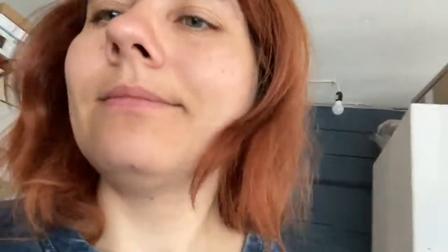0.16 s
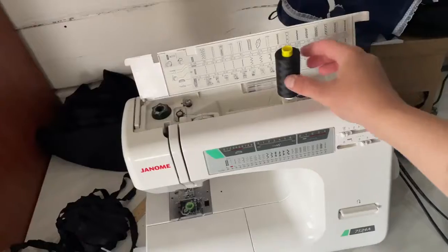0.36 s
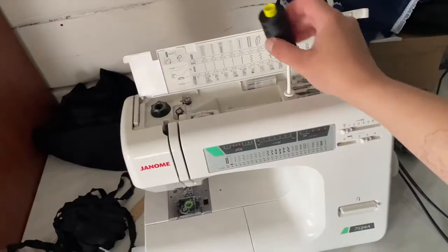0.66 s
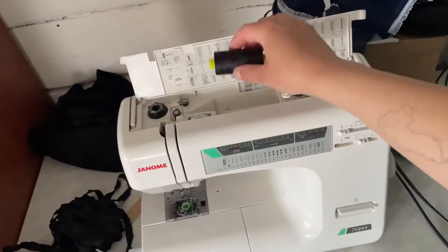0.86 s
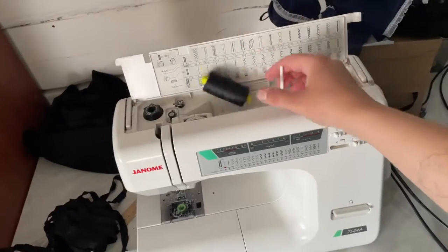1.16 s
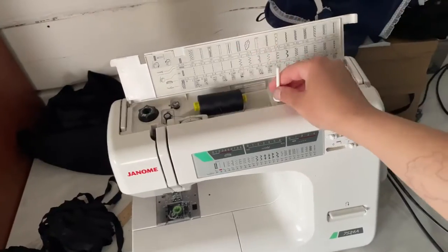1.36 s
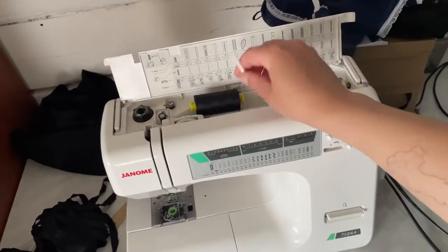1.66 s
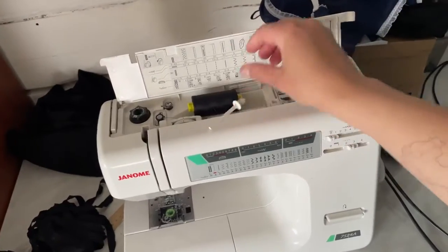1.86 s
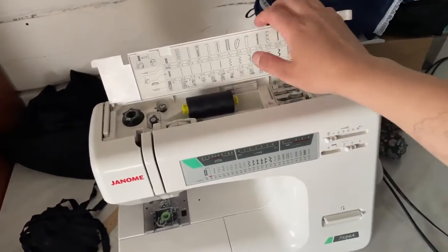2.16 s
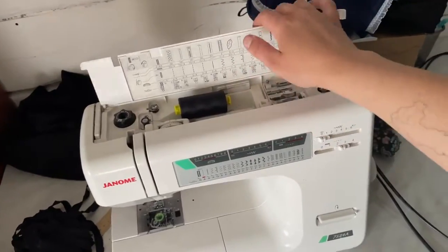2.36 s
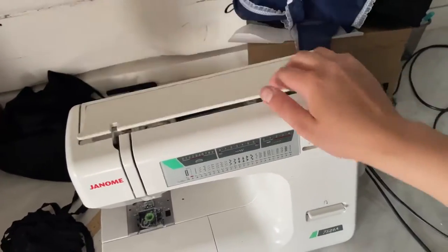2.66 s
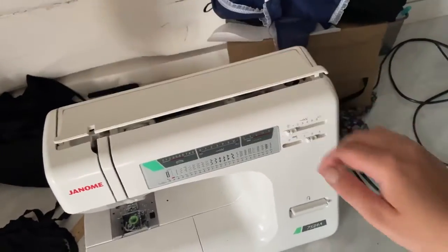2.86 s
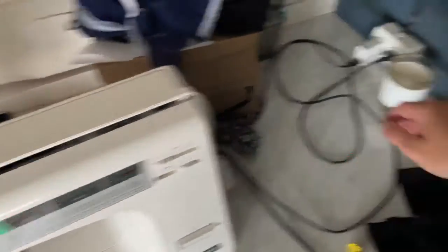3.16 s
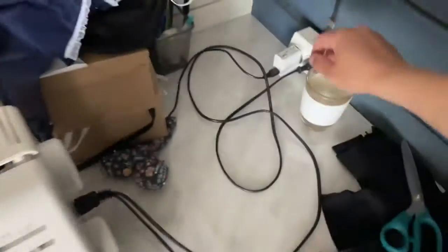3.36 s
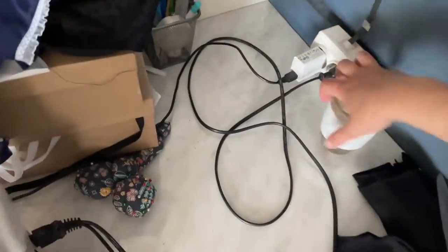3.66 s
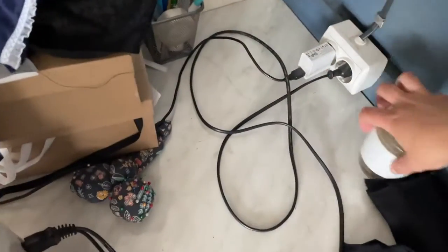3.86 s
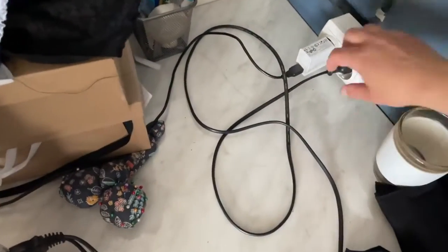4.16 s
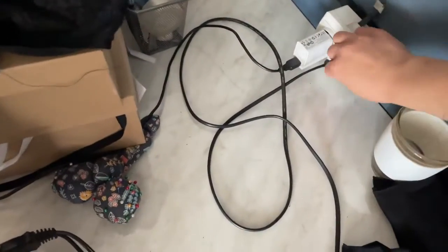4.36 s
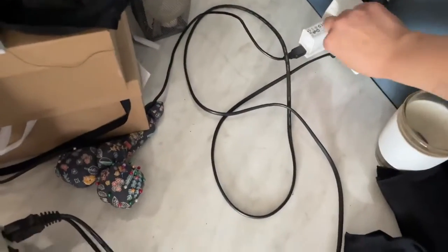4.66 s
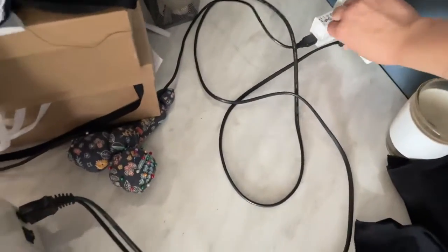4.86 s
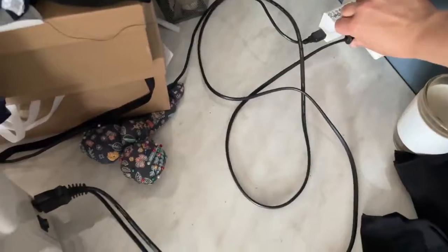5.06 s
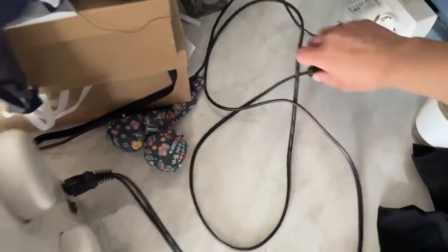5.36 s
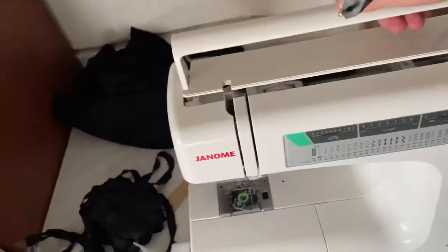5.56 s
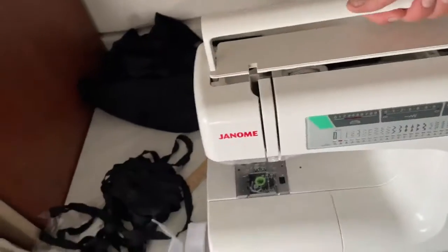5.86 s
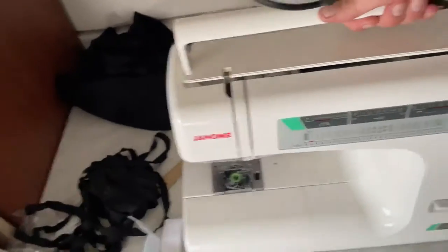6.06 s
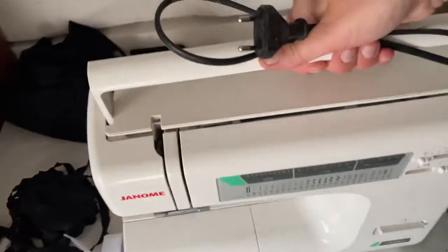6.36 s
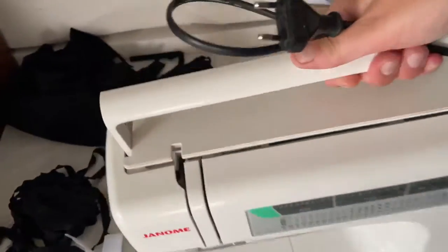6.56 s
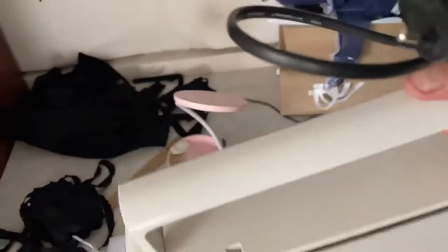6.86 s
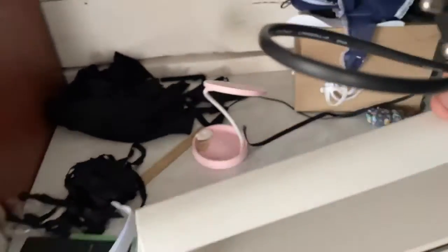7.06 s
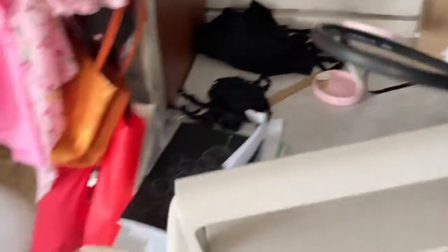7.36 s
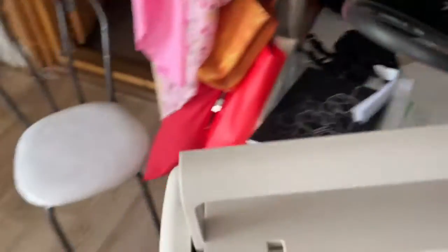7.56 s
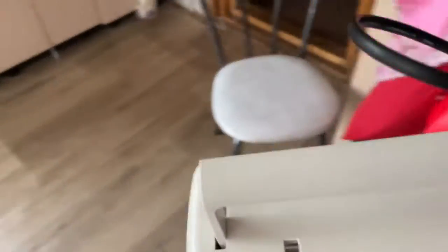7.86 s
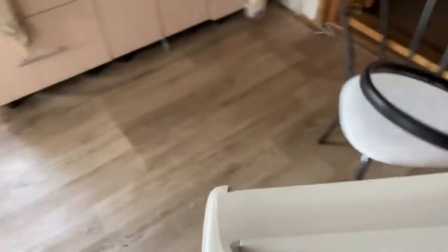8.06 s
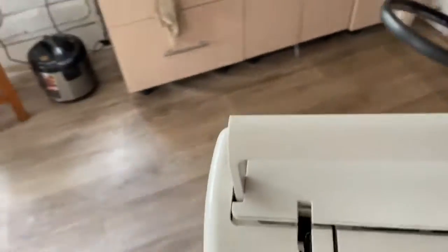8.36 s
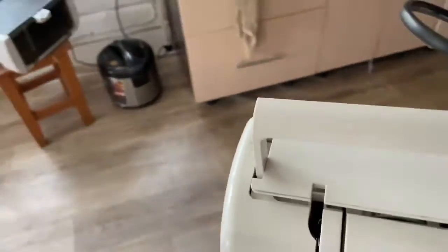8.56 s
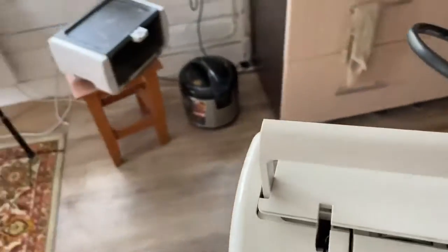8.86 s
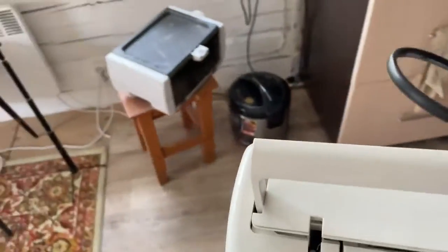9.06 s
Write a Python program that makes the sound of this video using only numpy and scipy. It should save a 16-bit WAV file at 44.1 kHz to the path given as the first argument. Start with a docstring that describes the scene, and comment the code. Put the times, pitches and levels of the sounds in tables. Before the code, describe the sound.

Close phone microphone, small furnished room with a short echo, quiet room tone and faint low hum. A very soft bump and hand brush open it; light plastic taps come around 0.3 to 0.7 s. At 1.05 s a spool clacks into a hollow case, with sharp knocks at 1.25 and 1.35. A hard snap at 1.86 leads to a quick rattle of small parts until 2.2. The lid claps shut at 2.65. Softer rustling and low rumble follow; a cup knocks dully at 3.7 to 3.8 and is set down faintly near 4.1. Small clicks lead to a crisp plug click at 5.0. From 5.5 to 6.6 the handle and case clunk and bump as the machine is lifted. Carrying is quieter, with cord ticks at 7.1 to 7.8 and rustles. From 8.4 hollow rattling builds to a heavy thump at 8.74, then smaller knocks until about 9.2.

```python
"""First a soft bump and a brush of the hand, then a plastic sewing machine is packed up close to a phone:
spool and pin clack into the case, the lid shuts, a cup is moved, a plug is pulled, then the machine is
lifted and carried, rattling. Hits are short noise or tones ringing plastic parts, case and desk; a small
furnished room answers clacks and thuds. Shaped noise makes clothes and cord rustle, the rumble of desk
and steps, and the room tone; a faint hum wavers."""
import sys
import numpy as np
from scipy import signal
from scipy.fft import rfft, irfft
from scipy.io import wavfile
from scipy.ndimage import uniform_filter1d

SR = 44100
rng = np.random.default_rng(int(sys.argv[2]) if len(sys.argv) > 2 else 0)


def dump(signal):
    """Clip the signal to [-1, 1] and save it as 16-bit WAV at the path in sys.argv[1]."""
    limited = np.clip(np.atleast_2d(signal).T, -1, 1)
    pcm = np.round(limited * 32767).astype(np.int16)
    wavfile.write(sys.argv[1], SR, pcm)


N = 405719  # length [samples]

# t60 is the time to fall 60 dB; left over right is the level difference between the two channels.
# Hard contacts of plastic parts: (time [s], level [dB], middle share [dB], top share [dB], first ring [Hz],
# second ring [Hz], second ring strength [dB], trail t60 before limits [s], left over right [dB])
CLACKS = [(0.321, -41, -9, -24.5, 1030, 5030, 16, 0.072, 4),
          (0.338, -38.5, -29, -32, 690, 3140, 7, 0.035, -12),
          (0.352, -50.5, -2, -11, 1110, 3280, 9, 0.036, 6),
          (0.515, -40.5, -27, -32, 1010, 3160, 21, 0.094, 15),
          (0.524, -30, -19, -21.5, 1200, 4070, 15, 0.051, 2),
          (0.724, -34, -13.5, -27, 1290, 1790, -3, 0.076, 1.5),
          (1.045, -18, -29, -35, 870, 4350, 17, 0.12, 1.5),
          (1.164, -41.5, -19, -22, 1290, 2800, 2, 0.084, 0.5),
          (1.232, -29.5, -24, -31, 805, 3930, -12, 0.064, 2),
          (1.255, -11, 1, -8, 1150, 3320, -8, 0.049, 2.5),
          (1.341, -15.5, -22.5, -32.5, 965, 2060, 8, 0.075, 2.5),
          (1.526, -48.5, -17, -24, 1140, 2665, 18.5, 0.064, 4),
          (1.855, -28.5, -11, -11, 700, 5880, -1, 0.096, -3),
          (1.864, -7.5, -8, -19, 1120, 1870, 9, 0.057, 2.5),
          (1.871, -18, -14, -28, 1130, 2470, 4, 0.052, 0),
          (1.926, -29.5, -10, -9.5, 870, 3480, 14, 0.081, 3),
          (1.978, -19, -14.5, -33, 1950, 3860, 16, 0.066, 2.5),
          (2.016, -39, -6, -26, 2080, 2610, 11, 0.08, 0),
          (2.06, -17, -11.5, -14.5, 1880, 3730, 14, 0.076, 4.5),
          (2.083, -26, -22, -30, 1200, 3020, -5, 0.03, 4), (2.101, -17.5, -5, -9, 1220, 5840, 14, 0.075, 0),
          (2.113, -22, -5, -12, 1120, 3800, 3, 0.096, 2), (2.122, -24, -2, -15, 1900, 2610, 15, 0.05, -2),
          (2.143, -27, 1, -8, 1170, 3800, 7, 0.14, 3), (2.158, -35, -11, -20, 1150, 2100, 0, 0.036, 2),
          (2.168, -29.5, 1, -6, 1980, 5250, 7, 0.11, -3),
          (2.197, -24.5, -2.5, -9.5, 1770, 3670, -10, 0.063, 2.5),
          (2.321, -48, -13, -27, 1690, 5600, 25, 0.073, 1),
          (2.401, -52.5, -24.5, -38.5, 1310, 3440, 7.5, 0.16, 8.5),
          (2.431, -39.5, -29, -43, 855, 3210, 12.5, 0.069, 4.5),
          (2.633, -22, -12, -15.5, 1305, 2740, 1.5, 0.19, -1),
          (2.639, -13.5, -30, -23, 1300, 1995, 5, 0.079, 6),
          (2.645, -8.5, -15.5, -30, 1473, 2050, 3, 0.094, 2.5),
          (2.679, -15.5, -16, -16.5, 1090, 3280, 15, 0.16, 1),
          (2.701, -19.5, -13, -32, 890, 2800, 5, 0.13, 6.5),
          (2.719, -20, -22, -19, 1120, 2670, 6.5, 0.064, 3),
          (3.115, -37.5, -15, -13.5, 1040, 5450, 8, 0.11, 3),
          (3.374, -42.5, -18, -21, 1150, 3220, 3, 0.24, 3),
          (3.667, -40.5, -35, -25, 1710, 4290, 23, 0.04, 0), (3.8, -27, -33, -37.5, 730, 2830, 4, 0.091, 3),
          (4.326, -39, -23, -23, 1120, 797, 6, 0.054, 0.5),
          (4.524, -53, -31, -27, 1150, 2200, -1.5, 0.028, 0.5),
          (4.57, -56.5, -18, -9.5, 1146, 3040, 15.5, 0.08, 2.5),
          (4.746, -35, -23, -15.5, 1060, 4550, 17, 0.094, -1),
          (4.799, -35.5, -17, -17, 1050, 4930, 1, 0.046, 0),
          (4.813, -32, -17.5, -25, 930, 4830, -10, 0.074, 0),
          (4.887, -41.5, -24, -27, 1140, 3950, 7, 0.21, -1), (4.91, -35, -14, -24, 980, 4600, 1, 0.22, 1),
          (4.941, -18, -23, -27, 920, 4660, 11, 0.03, 0), (4.997, -13.5, -17, -16, 1020, 1800, 0, 0.033, 2),
          (5.004, -18.5, -23, -18, 780, 1850, 11, 0.027, -3),
          (5.012, -22.5, -3, -10, 800, 3600, 11, 0.03, 2.5),
          (5.197, -38.5, -12, -12, 806, 4300, 19, 0.12, 0),
          (5.209, -28.5, -16.5, -27.5, 1480, 2660, 9, 0.049, 2.5),
          (5.4, -35, -15, -36, 2040, 2630, 4, 0.074, 1.5),
          (5.521, -19.5, -9, -16.5, 1800, 5100, 13, 0.072, -0.5),
          (5.545, -22, -11, -23.5, 1280, 3280, -8, 0.084, 1),
          (5.638, -36, -14, -25, 750, 2680, 2, 0.094, 1),
          (5.711, -27, -10.5, -20.5, 1790, 2500, 9, 0.047, 4),
          (5.87, -27.5, -3.5, -21.5, 1060, 2100, 3, 0.069, 0.0),
          (5.985, -32.5, -12, -26.5, 1860, 3730, 11, 0.11, 1),
          (6.014, -27, -18, -23, 1910, 3380, 9, 0.068, 0.5),
          (6.068, -23, -25, -29, 670, 4560, -13, 0.082, 0.5),
          (6.104, -21.5, -18.5, -28.5, 2110, 1020, 4, 0.056, 0.5),
          (6.126, -39, -9, -19, 1180, 3540, 9, 0.1, 4), (6.158, -38.5, -11, -20, 912, 2720, 10, 0.063, 2.5),
          (6.184, -42, -21, -30, 1560, 3000, 0, 0.046, 0), (6.206, -32, -17, -31, 1790, 4040, 1, 0.073, 3),
          (6.238, -17.5, -18, -25, 1390, 2100, -1, 0.034, 1),
          (6.305, -26.5, -19.5, -37, 1820, 3200, -3, 0.042, 3.5),
          (6.462, -37.5, -22, -27, 920, 4300, -7, 0.19, 4), (6.59, -49, -22, -15, 1900, 3220, 8, 0.31, 0.5),
          (6.634, -46.5, -10, -20, 1180, 2800, -0.5, 0.14, 6),
          (7.088, -41.5, -19, -19.5, 950, 5370, 8, 0.059, -2),
          (7.636, -21.5, 1, -21, 1430, 3920, 2, 0.023, -3), (7.645, -24, -32, -35, 980, 3140, 1, 0.066, -4),
          (7.89, -29.5, -8, -22, 754, 2840, 9, 0.23, 3), (7.9, -30.5, -8.5, -19, 950, 3740, 10, 0.31, 2),
          (8.404, -35.5, -13, -33, 890, 2840, -10, 0.22, -1),
          (8.501, -26, -10, -16.5, 1230, 2980, 3, 0.26, 2.5),
          (8.614, -33, -29, -21, 1020, 2840, 16, 0.24, 0.0),
          (8.671, -31.5, -37, -31, 947, 2900, 7, 0.088, 6),
          (8.721, -13.5, -12.5, -17.5, 710, 4070, 18, 0.25, -0.5),
          (8.741, -16, -19, -20.5, 900, 4100, -3, 0.19, 3), (8.778, -36, -12, -4, 2170, 4000, 7, 0.19, 6),
          (8.908, -30, -3, -11, 890, 2820, -7, 0.27, 4), (8.957, -32.5, -16, 6, 974, 6530, 2, 0.26, 2),
          (9.108, -33, -15, -23, 940, 5100, 18, 0.21, 0)]
# Soft blows on case and desk: (time [s], peak [dB], pitch of the struck spot [Hz],
# t60 [s], left over right [dB])
THUDS = [(0.003, -35.5, 373, 0.086, -1), (0.329, -37, 169, 0.041, 2), (0.521, -27, 422, 0.11, -3),
         (0.748, -41, 314, 0.23, -2), (1.047, -22, 446, 0.045, -3), (1.053, -25.5, 323, 0.1, -2),
         (1.162, -31, 175, 0.083, 1), (1.345, -14.5, 426, 0.097, -2.5), (1.356, -30.5, 149, 0.11, 1),
         (1.523, -44, 406, 0.12, -8), (1.864, -22.5, 473, 0.1, -1), (1.885, -29, 530, 0.19, -1),
         (1.908, -29, 492, 0.2, -3), (2.013, -32.5, 511, 0.057, -2), (2.061, -28, 440, 0.06, -3),
         (2.148, -34.5, 405, 0.12, -5), (2.197, -38.5, 418, 0.12, -4), (2.43, -49.5, 440, 0.17, -4),
         (2.648, -14, 442, 0.064, -2), (2.679, -29, 560, 0.055, 0), (2.7, -24, 493, 0.055, -2),
         (3.666, -20, 310, 0.066, 0.5), (3.678, -33, 514, 0.051, -4), (3.761, -35, 355, 0.19, -3),
         (3.799, -18, 155, 0.042, -1), (3.81, -25, 502, 0.05, -1), (4.091, -30, 330, 0.075, -3),
         (4.1, -32.5, 130.5, 0.11, 1), (4.331, -45, 109.6, 0.093, -2.5), (4.998, -26, 152, 0.14, -2),
         (5.212, -32, 137, 0.027, 0), (5.406, -35.5, 135, 0.1, 1), (5.482, -41.5, 430, 0.09, -9),
         (5.548, -26, 433, 0.056, -7), (5.563, -32, 137, 0.088, 0), (5.643, -34.5, 128, 0.073, -1.0),
         (5.876, -37.5, 387, 0.058, -9), (5.992, -35.5, 383, 0.059, -3), (6.015, -27, 312, 0.055, -4),
         (6.065, -28, 522, 0.076, -7), (6.085, -26, 319, 0.098, -3), (6.123, -23, 199, 0.051, 1),
         (6.152, -20.5, 233, 0.04, 2), (6.214, -24.5, 540, 0.074, -3), (6.225, -27.5, 364, 0.12, -5),
         (6.307, -23.5, 168, 0.087, 6), (6.383, -35, 203, 0.15, 3), (6.442, -32, 200, 0.11, 4),
         (6.468, -41, 396, 0.08, -6), (6.503, -32.5, 204, 0.072, 7), (6.56, -38.5, 201, 0.11, 2),
         (6.6, -46, 412, 0.086, -7), (6.625, -39, 208, 0.07, 2), (7.645, -32.5, 419, 0.021, -5),
         (7.88, -31, 291, 0.09, -1), (8.42, -48, 160, 0.098, 3), (8.516, -21, 435, 0.055, 3.5),
         (8.612, -23, 160, 0.12, 3), (8.624, -18, 413, 0.08, 4), (8.648, -27, 422, 0.11, 0),
         (8.67, -18, 161, 0.1, 1), (8.718, -14, 219, 0.053, 3), (8.727, -14.5, 634, 0.22, 1),
         (8.743, -5, 414, 0.12, 1), (8.777, -13.5, 414, 0.08, -2), (8.822, -26.5, 484, 0.06, -5),
         (8.901, -18, 160, 0.046, 2), (8.915, -21, 442, 0.095, 5), (8.936, -22.5, 399, 0.074, -5),
         (9.099, -24.5, 376, 0.086, 3), (9.105, -27, 138.4, 0.21, 0), (9.114, -18, 404, 0.1, 2.5),
         (9.15, -29, 380, 0.12, -6)]
# Low dying tones of desk and lid: (time [s], level [dB], pitch [Hz])
BOOMS = [(1.055, -26, 67.2), (1.248, -32, 65.7), (1.35, -34, 63.5), (2.649, -26.5, 68.7),
         (2.696, -27.5, 129.7), (3.33, -34.5, 54), (3.409, -31, 52.2), (3.667, -32, 63.3),
         (4.098, -48, 73.1), (5.55, -36, 73.5), (6.025, -32.5, 70.8), (6.308, -35.5, 55),
         (7.942, -39, 49.6), (8.533, -35.5, 70.4), (8.736, -39, 53.5)]
# The plug against the handle, right by the phone: (time [s], level [dB], low ring [Hz], high ring [Hz],
# high against low [dB], left over right [dB])
TICKS = [(7.075, -31, 5300, 7000, -2, 5.5), (7.133, -54, 2110, 4750, -17, -4),
         (7.235, -39.5, 2850, 6800, 14, 5.5), (7.741, -41, 1540, 5200, -11, 1),
         (7.841, -34, 1230, 4450, -15, 0)]
# Short clear rings of cup, plug, desk and small parts: (time [s], level [dB], pitch [Hz],
# t60 before limits [s])
PINGS = [(0.258, -39.5, 686, 0.018), (1.341, -27, 2140, 0.053), (2.732, -31.5, 880, 0.15),
         (3.663, -34, 853, 0.031), (3.667, -43, 1720, 0.09), (4.996, -17.5, 4510, 0.029),
         (5.012, -21, 4480, 0.043), (5.522, -31, 1835, 0.045), (6.128, -44, 3554, 0.082),
         (8.726, -29.5, 2133, 0.26)]
# Short narrow bands of rubbing and ringing, of cup, desk and small parts: (start [s], length [s],
# first pitch [Hz], last pitch [Hz], width [Hz], level before the fade in and out [dB])
SCRAPES = [(.575, .06, 2940, 3220, 500, -59.5), (0.633, 0.033, 2290, 2250, 300, -61),
           (0.657, 0.086, 2600, 3300, 1200, -56), (0.704, 0.051, 4600, 4600, 400, -67),
           (0.712, 0.04, 1290, 1300, 500, -57), (1.876, 0.11, 870, 880, 60.4, -45),
           (1.882, 0.11, 564, 535, 122, -47), (3.362, 0.25, 1220, 1960, 905, -59.5),
           (3.793, 0.24, 2820, 2900, 200, -57), (3.839, 0.24, 305, 301, 30, -47.5),
           (4.329, 0.21, 391, 351, 149, -62), (4.562, 0.036, 3030, 3050, 300, -70),
           (4.561, 0.031, 1980, 1900, 602, -69), (4.757, 0.51, 886, 850, 306, -67),
           (6.366, 0.14, 1190, 1790, 810, -61.5), (6.58, 0.089, 1900, 1880, 700, -58),
           (7.509, 0.27, 1890, 1900, 400, -63), (8.61, 0.14, 1040, 950, 150, -60),
           (8.62, .06, 5300, 5200, 400, -58), (8.729, 0.06, 4020, 3950, 250, -46),
           (8.861, 0.049, 840, 820, 80, -46), (8.868, .025, 1950, 1950, 150, -47),
           (8.904, 0.051, 3940, 3970, 250, -49), (8.907, .06, 1090, 1050, 120, -50),
           (9.11, 0.056, 2130, 2180, 250, -54)]
# Strokes of hand, cloth and cord: (start [s], rise [s], hold [s], rustle before the panels ring [dB],
# brightness [dB per octave above 2 kHz], drag on the desk [dB])
STROKES = [(0, 0.0044, 0.01, -60, -5, -80), (0.363, 0.067, 0.18, -65.5, -1.5, -56.5),
           (0.512, 0.077, 0.11, -60.5, 4.5, -75), (1.067, 0.16, 0.16, -51.5, -5.5, -39),
           (1.362, 0.042, 0.072, -66, -12.5, -44), (1.874, 0.06, 0.083, -45, -2.5, -55),
           (2.05, 0.014, 0.12, -45.5, -1.5, -48), (2.385, 0.061, 0.033, -72, -7, -50.5),
           (2.51, 0.11, 0.22, -60, -2, -49), (2.992, 0.15, 0.086, -53, 0.5, -55),
           (3.265, 0.046, 0.018, -51, 3.5, -58), (3.328, 0.15, 0.19, -51.5, -3.5, -48),
           (3.716, 0.13, 0.14, -45, -3, -40), (4.284, 0.059, 0.19, -68, -4, -60.5),
           (4.548, 0.035, 0.24, -81.5, 6, -70), (4.845, 0.086, 0.15, -56.5, -0.5, -49.5),
           (5.18, 0.043, 0.41, -55.5, -6, -54), (5.476, 0.033, 0.18, -55.5, 1, -42.5),
           (5.831, 0.046, 0.048, -57.5, 0, -58.5), (5.973, 0.033, 0.3, -50, -3.5, -39.5),
           (6.3, 0.12, 0.079, -59.5, -2.5, -49), (6.54, 0.05, 0.098, -58.5, 0, -72),
           (6.689, 0.12, 0.34, -56, -3.5, -54), (7.165, 0.096, 0.13, -62, 2, -50.5),
           (7.45, 0.07, 0.25, -60, -1.5, -50), (7.622, 0.067, 0.34, -55, -7.5, -58),
           (7.853, 0.025, 0.23, -52.5, -0.5, -46.5), (8.166, 0.15, 0.16, -61, 0, -54),
           (8.37, 0.051, 0.068, -44, -3, -44.5), (8.488, 0.034, 0.063, -39.5, -4.5, -35),
           (8.598, 0.03, 0.1, -42, -5.5, -30), (8.663, 0.058, 0.2, -38.5, -0.5, -40.5),
           (8.852, 0.047, 0.15, -39.5, -1.5, -33.5), (9.058, 0.045, 0.087, -41, 1, -34.5)]
# Level of the rumble of desk, steps and handling: (time [s], level [dB])
RUMBLE_LEVEL = [(0.0, -92), (0.28, -58), (0.56, -51), (1.13, -53.5), (1.25, -52), (1.33, -50),
                (1.56, -66.5), (1.84, -64), (2.61, -52), (2.79, -55), (3.02, -57), (3.23, -49),
                (3.41, -46.5), (3.54, -50), (4.23, -48), (4.46, -53.5), (5.99, -50), (6.2, -41.5),
                (6.74, -57.5), (6.94, -59), (8.1, -51), (8.25, -77.5), (8.5, -41), (8.63, -45),
                (8.74, -28.5), (9.2, -76)]
# Typical modes of the hollow case and desk: (pitch [Hz], level [dB], t60 [s])
BODY_MODES = [(125, -16.5, 0.058), (214, 6, 0.057), (242, -0.5, 0.043), (319.9, 2.5, 0.23),
              (377.7, -3, 0.077), (413.8, 4, 0.17), (482, -2.5, 0.1), (513, 0, 0.19), (566, -2, 0.069),
              (642, 2, 0.034)]
# Typical modes of the plastic panels: (pitch [Hz], width [Hz], level [dB])
PANEL_MODES = [(860, 120, -1.5), (1126, 49, -3), (1640, 70, -7), (1890, 46, -7), (2094, 150, -6),
               (2540, 60, -12.5), (3120, 50, -8.5), (3490, 43, -8.5), (3820, 44, -3), (4430, 90, -13),
               (5100, 950, -2), (5690, 330, -11), (6340, 460, -6.5), (7360, 80, -15)]
# Relative colours of the noises: (frequency [Hz], level per Hz [dB])
RUSTLE_COLOUR = [(290, -19.5), (500, -3.5), (698, -20.5), (919, 0), (1000, -9), (2190, -13), (2930, -14.5),
                 (10200, -22.5), (12300, -28), (13600, -34), (16000, -40.5)]
DRAG_COLOUR = [(65, -28.5), (110, -0.5), (236, -14), (308, -5.5), (367, -10), (434, -12), (522, -16.5),
               (570, -21.5), (900, -23.5), (1170, -44), (1980, -120)]
RUMBLE_COLOUR = [(12, -55.5), (20, -17), (54, 9), (70, -5), (97, 5.5), (130, -6), (160, -20), (210, -42),
                 (350, -120)]
ROOM_TONE_COLOUR = [(47, -38.5), (80, 3), (114, -3), (178, -22), (331, -12), (615, -27), (1090, -26),
                    (4730, -32.5), (8050, -37), (9610, -32.5), (16000, -80)]
# How alike left and right are: (frequency [Hz], likeness [0 to 1])
LIKENESS = [(60, 1), (200, 0.92), (450, 0.71), (800, 0.67), (2000, 0.062), (6000, 0.26), (9000, 0.55),
            (10800, 0.68), (13500, 0.9)]
# How far the left microphone leads the right: (frequency [Hz], phase [radians])
MIC_LEAD = [(0, 0), (130, 0.64), (420, -0.13), (520, 1.26), (650, 2), (860, 2), (1120, 0.68), (1550, 0.8),
            (2150, 0), (2410, 1.16), (6030, 9.5), (6370, 7.5), (7750, 3), (10200, 0.65), (12500, 0.5),
            (13200, -3.5), (16500, -3)]
# How fast the room dies away: (frequency [Hz], t60 [s])
ROOM_DECAY = [(150, 0.3), (500, 0.24), (2000, 0.22), (8000, 0.19)]
# Tone of the room: (frequency [Hz], level [dB])
ROOM_COLOUR = [(200, -5.5), (500, -1.5), (1000, -2.5), (12400, -0.5)]

TRAIL_DB, TRAIL_DB_PER_DOUBLING = -6, 1.5  # a longer trail is also stronger against the crack
CREST_DB = 9.5  # peak of a contact over its short-time rms
THUD_RISE_S = 0.0041
BOOM_CYCLES = 40  # cycles until a boom has fallen 60 dB
STROKE_FADE_DB_PER_S = 158.5
SWELL_DB = 1.35  # the pressure of a rubbing hand wavers
ROOM_TONE_DB, ROOM_TAIL_DB = -64, -7
HUM_HZ, HUM_DB, HUM_WAVER_DB = 100, -60, 5.4  # mains hum near the desk
EDGE_HZ = 15800  # upper limit of the phone


def clack(db, middle, top, first_hz, second_hz, second_db, t60, pan):
    """A sharp crack, then a trail of tiny uneven contacts, rings the struck part and the panels."""
    t = np.maximum(np.arange(8192) / SR - .002, 0)  # silent for the first 2 ms
    hz = np.fft.rfftfreq(8192, 1 / SR)
    t60 = np.clip(t60, .006, .3)
    # middle and top shares are spread per Hz over their bands; little lies below the panels
    colour = read([(300, -30.0), (600, -16.0), (1400, -15.5), (3000, middle - 5), (7000, top - 8),
                   (11000, top - 8), (13000, top - 17), (15500, top - 19)], hz)
    # each hit finds the panels a little different
    panels = 0
    for (f, width, level), (u, v) in zip(PANEL_MODES, rng.standard_normal((len(PANEL_MODES), 2))):
        panels = panels + gain_of(level + 3.8 * u) * ring(hz, f * (1 + 0.02 * v), width)
    part = 4.4 * ring(hz, first_hz, 150) + gain_of(second_db) * ring(hz, second_hz, 190)

    crack = 1.9 * (1 - np.exp(-t / 0.0006)) * gain_of(-60 * t / 0.0052)
    strengths = np.minimum(rng.exponential(1, 128), 4)
    contacts = gain_of(3.5 * np.repeat(strengths, 64) - 3)
    trail_db = TRAIL_DB + TRAIL_DB_PER_DOUBLING * np.log2(t60 / 0.022)
    trail = gain_of(trail_db - 60 * t / t60) * contacts * (1 - np.exp(-t / 0.0024))

    noise = rng.standard_normal((2, len(t)))
    crack_spectra = rfft(noise * crack) * (1 + panels + part)
    trail_spectra = rfft(noise * trail) * (1 + 1.3 * panels + 0.68 * part)
    a, b = crack_spectra + trail_spectra
    burst = irfft(paired(a, b, hz) * gain_of(colour))
    burst /= np.sqrt(uniform_filter1d(burst.mean(0) ** 2, size=64).max())  # strongest short-time rms
    return gain_of(db - CREST_DB) * burst[:, :-256] * panned(pan)


def thud(db, hz, t60, pan):
    """A soft blow rings the struck spot, and most of all the case and desk modes near its pitch."""
    t = np.arange(12000) / SR
    t60 = np.clip(t60, .02, .5)
    out = gain_of(-60 * t / t60) * np.sin(2 * np.pi * hz * t - right_lag(hz))
    count = len(BODY_MODES)
    turns = rng.uniform(-0.23, 0.22, (count, 1, 1)) + 0.1 * rng.standard_normal((count, 2, 1))
    spread = rng.standard_normal((count, 2))
    for (mode_hz, mode_db, mode_t60), turn, (u, v) in zip(BODY_MODES, turns, spread):
        mode_hz, mode_db = mode_hz * (1 + 0.025 * u), mode_db + 3.9 * v  # grip and spot shift the modes
        near_db = -4 - 17 * abs(np.log2(mode_hz / hz))
        fade = gain_of(mode_db + near_db - 60 * t / np.sqrt(mode_t60 * t60))
        out += fade * np.sin(2 * np.pi * (mode_hz * t + turn) - right_lag(mode_hz))
    out *= 1 - np.exp(-(t / THUD_RISE_S) ** 2)
    return gain_of(db) * out / abs(out).max() * panned(pan)


def boom(db, hz):
    """A low, dying tone of desk or lid, reaching both microphones nearly alike."""
    t = np.arange(SR) / SR
    shape = (1 - np.exp(-t / 0.0055)) * gain_of(db - 60 * t * hz / BOOM_CYCLES)
    return shape * np.sin(2 * np.pi * (hz * t + np.array([[-.06], [.06]])))


def tick(db, low_hz, high_hz, high_db, pan):
    """One hard contact, a few milliseconds of noise, makes small parts ring for a few cycles only."""
    t, hz = np.arange(1024) / SR, np.fft.rfftfreq(1024, 1 / SR)
    a, b = rfft(rng.standard_normal((2, len(t))) * t * gain_of(-60 * t / 0.0064))
    high = ring(hz, high_hz, 910) + 0.027 * ring(hz, high_hz, 4150)
    body = ring(hz, low_hz, 370) + gain_of(high_db) * high
    body /= 1 + (hz / 10000) ** 6  # rolls off the very top
    sound = irfft(paired(a, b, hz) * body)[:, :512]
    return gain_of(db) * sound / abs(sound.mean(0)).max() * panned(pan)


def ping(db, hz, t60):
    """A single mode rings clearly and dies away."""
    t = np.arange(SR // 4) / SR
    shape = (1 - np.exp(-t / 0.0019)) * gain_of(db - 60 * t / np.clip(t60, .02, .4))
    return shape * np.sin(2 * np.pi * (hz * t + np.array([[0], [.1]])))


def scrape(length, first_hz, last_hz, width_hz, db):
    """Uneven noise drives a narrow resonance that can slide in pitch: a moment of rubbing or ringing."""
    t = np.arange(0, max(length, .01), 1 / SR)
    slips = gain_of(3.0 * np.repeat(rng.standard_normal(len(t) // 256 + 1), 256)[:len(t)])
    a, b = rng.standard_normal((2, len(t))) * slips
    # turn the noise down to 0 Hz, smooth it there, then turn it back: a narrow band that can slide
    turn = np.exp(2j * np.pi * np.cumsum(np.linspace(first_hz, last_hz, len(t))) / SR)
    r = np.exp(-np.pi * 1.55 * max(width_hz, 10) / SR)
    slow = signal.lfilter([1], np.convolve([1, -r], [1, -r]), np.array([a, 0.37 * a + .8 * b]) / turn)
    sound = evened((slow * turn * np.exp(-1j * right_lag(first_hz))).real)
    return gain_of(db) * sound * np.sin(np.pi * t / len(t) * SR) ** .6


def rustle_and_drag():
    """Each stroke rises, holds and fades; it rustles, ringing the case panels, and drags on the desk."""
    t = np.arange(N) / SR
    # powers of all strokes added up; brightness is weighted by rustle power
    rustling, bright, dragging = np.full((3, N), 1e-12)
    for start, rise, hold, rustle_db, bright_db, drag_db in STROKES:
        shape = np.clip((t - start) / max(rise, .005), 0, 1) ** 2.68
        shape *= gain_of(-2 * STROKE_FADE_DB_PER_S * np.clip(t - start - rise - hold, 0, 1))
        rustling += shape * gain_of(2 * rustle_db)
        bright += shape * gain_of(2 * rustle_db) * bright_db
        dragging += shape * gain_of(2 * drag_db)
    pressure = gain_of(SWELL_DB * slow_waver(1500))
    cloth = through_panels(hiss(RUSTLE_COLOUR, size=256, patchy_db=2.0, tilt_db=bright / rustling))
    desk = hiss(DRAG_COLOUR, size=1024, patchy_db=2.5)
    return pressure * (np.sqrt(rustling) * cloth + np.sqrt(dragging) * desk)


def through_panels(x):
    """Rubbing on the case rings its panels too."""
    size = N + N % 2
    hz = np.fft.rfftfreq(size, 1 / SR)
    panels = sum(0.38 * gain_of(level) * ring(hz, f, width) for f, width, level in PANEL_MODES)
    return irfft(rfft(x, size) * (1 + panels))[:, :N]


def rumble():
    """Low patchy noise of desk, steps and handling follows a table of levels."""
    level_db = np.interp(np.arange(N) / SR, *np.transpose(RUMBLE_LEVEL))
    return gain_of(level_db) * hiss(RUMBLE_COLOUR, size=4096, patchy_db=3.5)


def room(x):
    """Sparse echoes of random sign, each band dying at its own speed."""
    taps = np.zeros((2, SR // 2))
    at = np.arange(200, SR // 2 - 20, 20)
    at = at + rng.integers(0, 20, (2, len(at)))
    np.put_along_axis(taps, at, rng.choice([-1., 1.], at.shape), 1)
    hz, t, z = signal.stft(taps, SR, nperseg=256)
    z = paired(z[0].T, z[1].T, hz).transpose(0, 2, 1)
    fade_db = read(ROOM_COLOUR, hz)[:, None] - 60 * t / read(ROOM_DECAY, hz)[:, None]
    tail = signal.istft(z * gain_of(fade_db), SR, nperseg=256)[1]
    tail /= np.linalg.norm(tail[0])
    return signal.fftconvolve(x.mean(0)[None], tail, axes=1)[:, :N]


def hum():
    """A faint wavering tone that is left behind when the machine is carried off."""
    t = np.arange(N) / SR
    near = np.interp(t, [.25, .4, 5.4, 6.5], [0, 0.3, 0.92, 0.38])
    return gain_of(HUM_DB + HUM_WAVER_DB * slow_waver(4000)) * near * np.sin(2 * np.pi * HUM_HZ * t)


def room_tone():
    """Steady quiet noise of the room."""
    return gain_of(ROOM_TONE_DB) * hiss(ROOM_TONE_COLOUR, size=1024, patchy_db=0.0)


def hiss(colour, size, patchy_db, tilt_db=0.):
    """Stereo noise of a given colour with random patches; tilt lifts the top, frame by frame."""
    hop, hz = size // 4, np.fft.rfftfreq(size, 1 / SR)
    frames = N // hop + 5
    a, b, c, d, patches = rng.standard_normal((5, frames, len(hz)))
    patches = evened(uniform_filter1d(uniform_filter1d(patches, size=20, axis=0), size=4, axis=1))
    tilt = np.interp(np.arange(frames) * hop, np.arange(N), tilt_db * np.ones(N))[:, None]
    octaves = np.log2(np.maximum(hz, 2000) / 2000)
    z = paired(a + 1j * b, c + 1j * d, hz) * gain_of(read(colour, hz))
    z /= np.sqrt(np.mean(abs(z) ** 2))  # even the level before patches and tilt
    z *= gain_of(patchy_db * patches + tilt * octaves)
    out = signal.istft(z.transpose(0, 2, 1), nperseg=size, noverlap=size - hop)[1][:, :N]
    return out / np.sqrt(len(hz))


def ring(hz, centre, width):
    """Frequency response of one mode: strongest at its centre, narrower if it rings longer."""
    return 1 / (1 + 2j * (hz - centre) / width)


def paired(a, b, hz):
    """Two spectra become left and right: partly alike, and shifted in phase by the two microphone ports."""
    same = np.clip(read(LIKENESS, hz), -1, 1)
    right = same * a + np.sqrt(1 - same ** 2) * b
    return np.array([a, right * np.exp(-1j * read(MIC_LEAD, hz))])


def right_lag(hz):
    """Phase lag of each channel at one pitch, in radians: none on the left."""
    return read(MIC_LEAD, hz) * np.array([[0], [1]])


def panned(db):
    """Left and right factors for a level difference in dB."""
    return gain_of([[db / 2], [-db / 2]])


def slow_waver(size):
    """Random noise smoothed twice over size samples, scaled to rms 1."""
    return evened(uniform_filter1d(uniform_filter1d(rng.standard_normal(N), size=size), size=size))


def gain_of(db):
    """Decibels to a factor."""
    return 10 ** (np.asarray(db) / 20)


def evened(x):
    """Scales to rms 1."""
    return x / np.sqrt(np.mean(x ** 2) + 1e-20)


def read(points, hz):
    """Reads a table over log frequency."""
    f, value = np.transpose(points)
    return np.interp(np.log(hz + 1), np.log(f + 1), value)


def add(mix, s, sound):
    """Lays a stereo sound into the mix at time s."""
    part = mix[:, round(s * SR):][:, :sound.shape[1]]
    part += sound[:, :part.shape[1]]


def scene():
    """Clacks and thuds with their room tail, the other short sounds without, over rubbing and background."""
    hits, near = np.zeros((2, 2, N))
    for s, *row in CLACKS:
        add(hits, s - .002, clack(*row))  # makes up for the silent 2 ms
    for s, *row in THUDS:
        add(hits, s, thud(*row))
    for table, sound in [(BOOMS, boom), (TICKS, tick), (SCRAPES, scrape), (PINGS, ping)]:
        for s, *row in table:
            add(near, s, sound(*row))
    moves = rustle_and_drag() + rumble()
    return hits + gain_of(ROOM_TAIL_DB) * room(hits) + near + moves + hum() + room_tone()


def record(dry):
    """The phone cuts off everything above its upper limit."""
    low_pass = signal.firwin(511, EDGE_HZ, window=("kaiser", 9), fs=SR)
    return signal.oaconvolve(dry, low_pass[None], "same")


dry = scene()
out = record(dry)
dump(out)
```